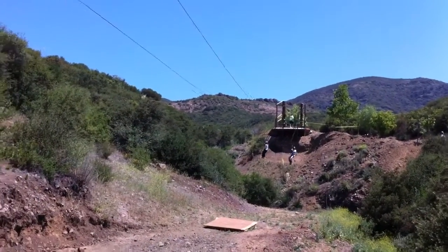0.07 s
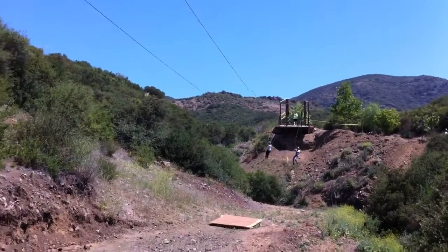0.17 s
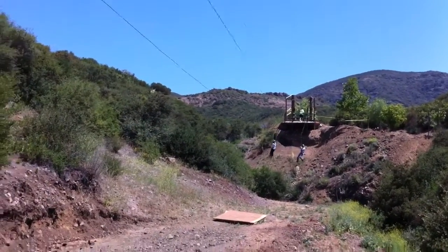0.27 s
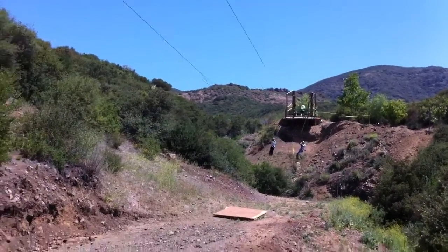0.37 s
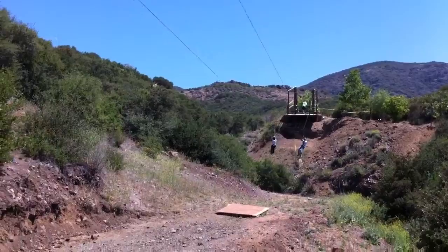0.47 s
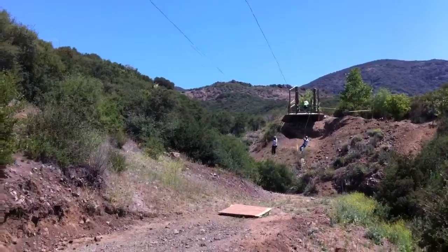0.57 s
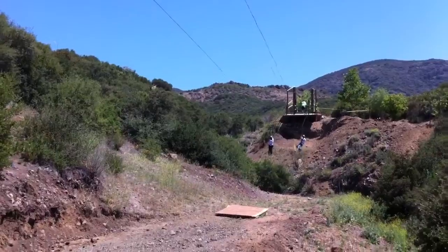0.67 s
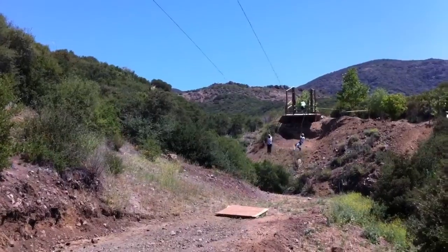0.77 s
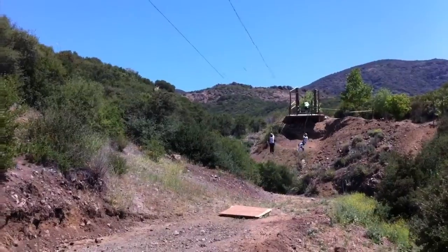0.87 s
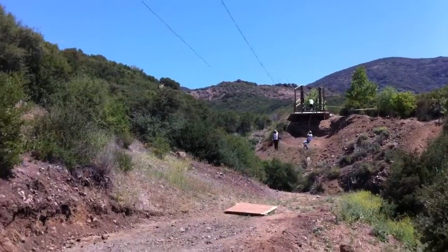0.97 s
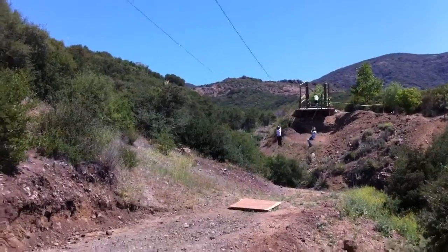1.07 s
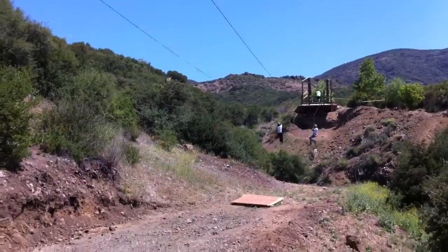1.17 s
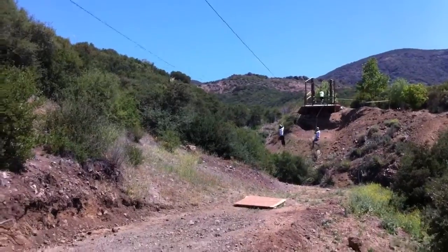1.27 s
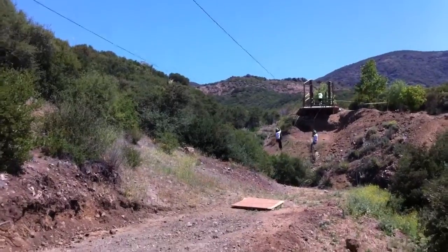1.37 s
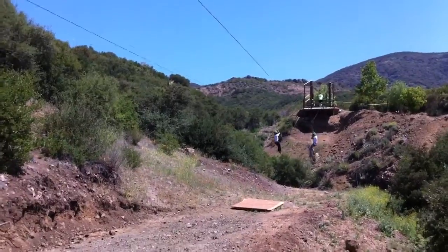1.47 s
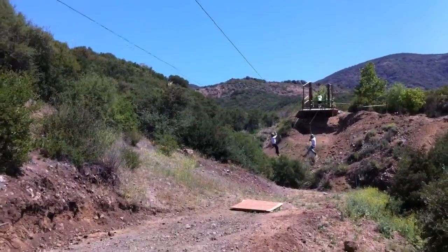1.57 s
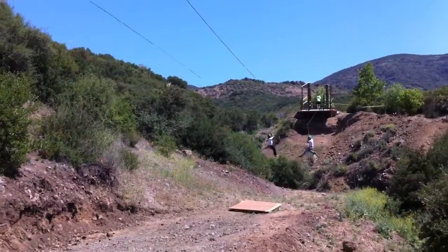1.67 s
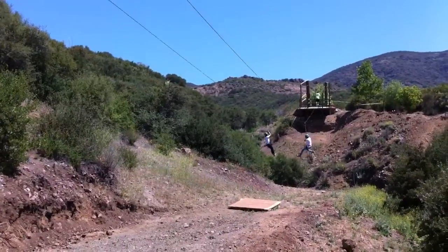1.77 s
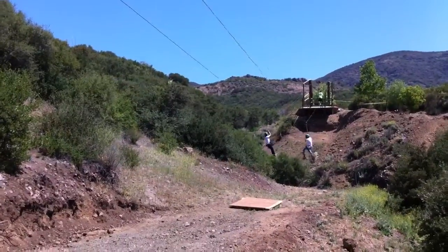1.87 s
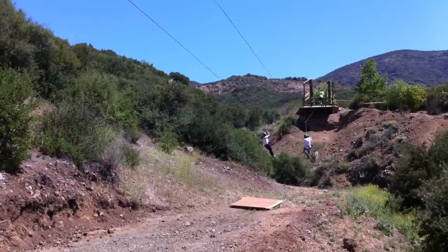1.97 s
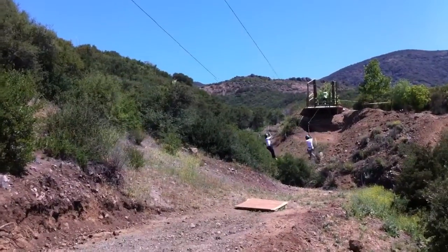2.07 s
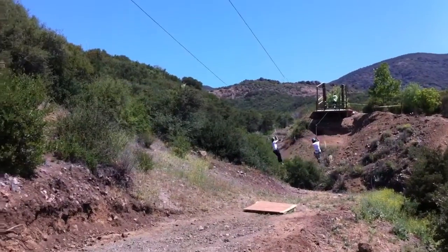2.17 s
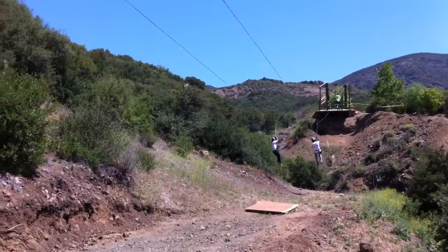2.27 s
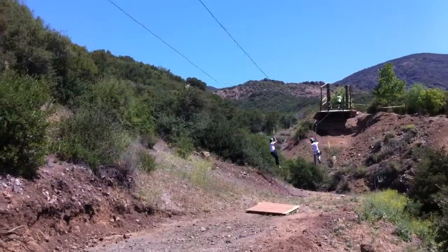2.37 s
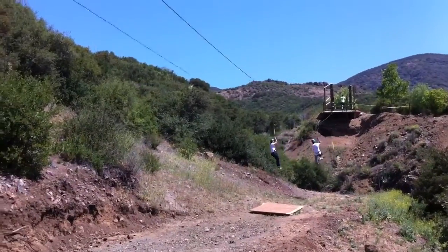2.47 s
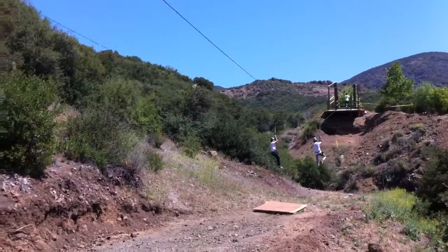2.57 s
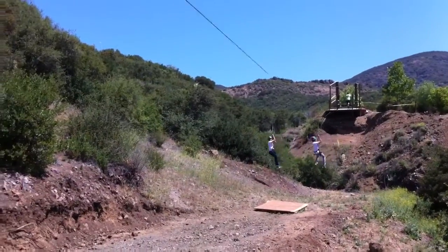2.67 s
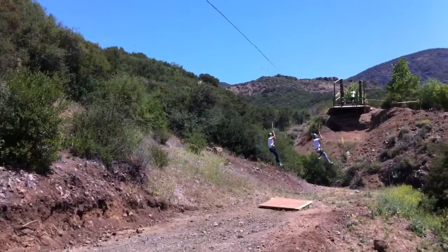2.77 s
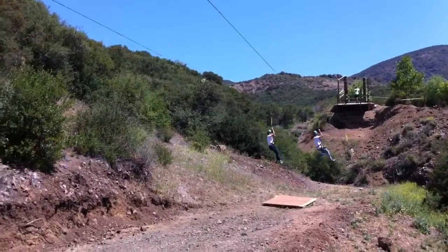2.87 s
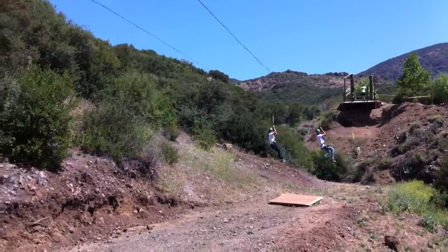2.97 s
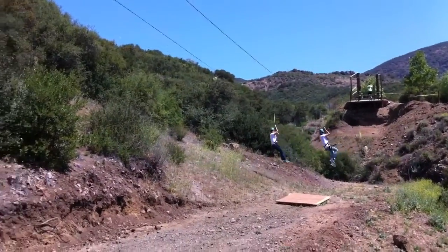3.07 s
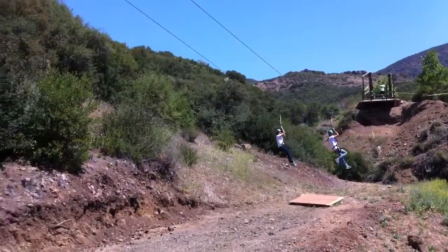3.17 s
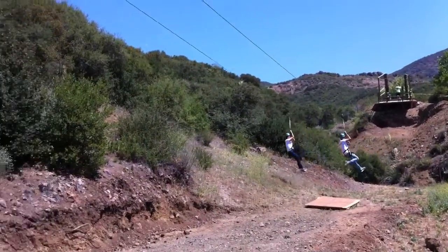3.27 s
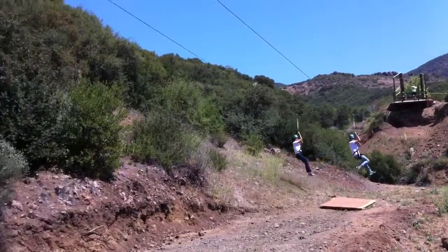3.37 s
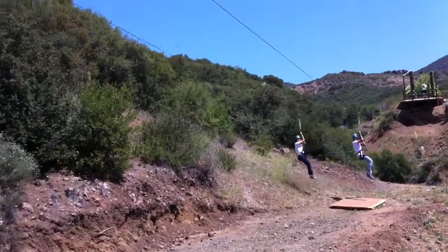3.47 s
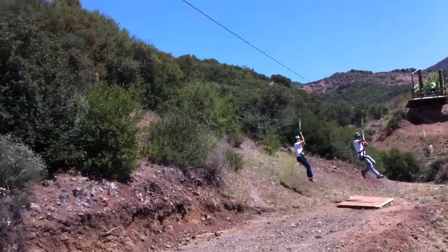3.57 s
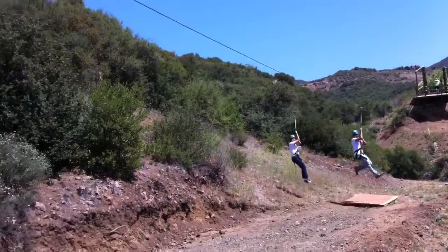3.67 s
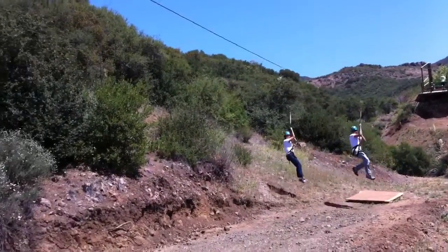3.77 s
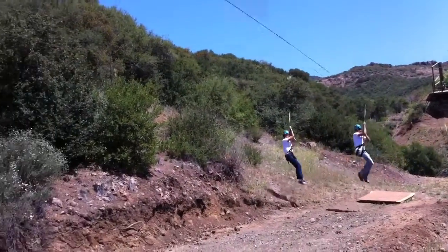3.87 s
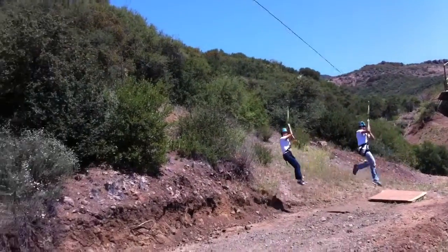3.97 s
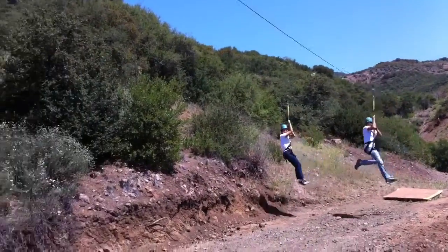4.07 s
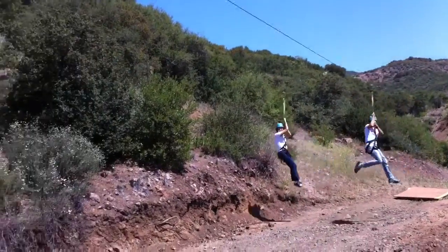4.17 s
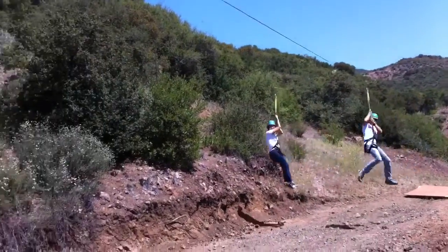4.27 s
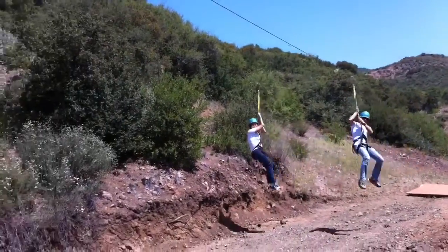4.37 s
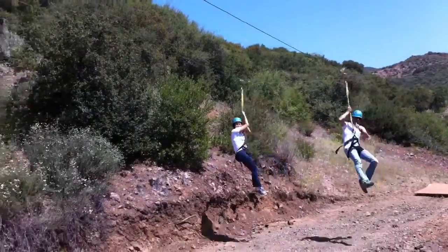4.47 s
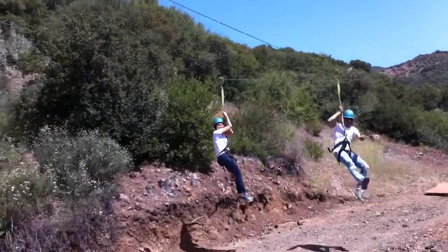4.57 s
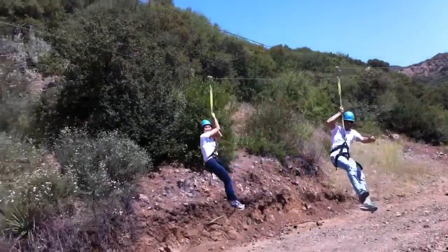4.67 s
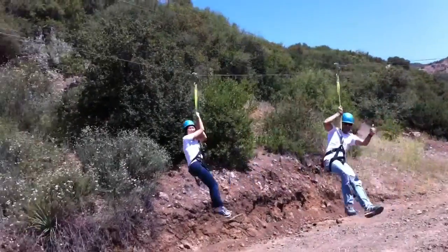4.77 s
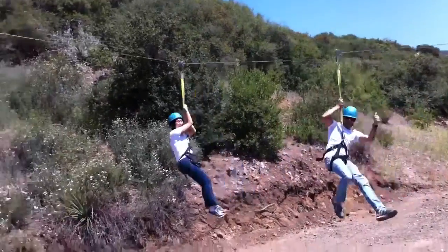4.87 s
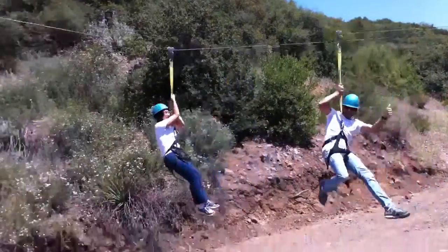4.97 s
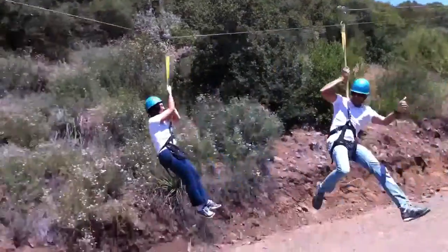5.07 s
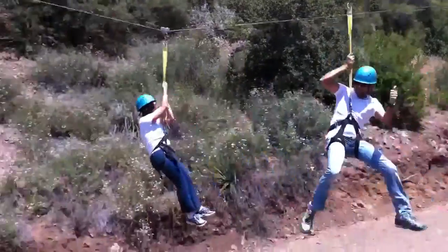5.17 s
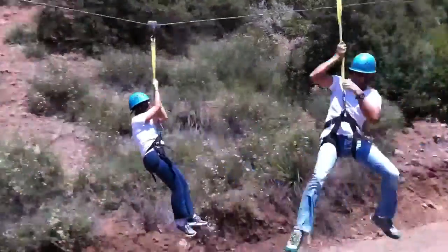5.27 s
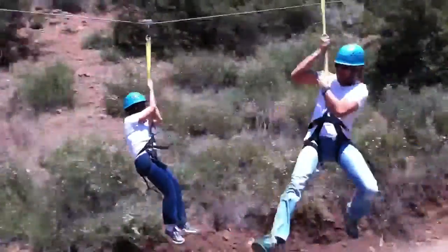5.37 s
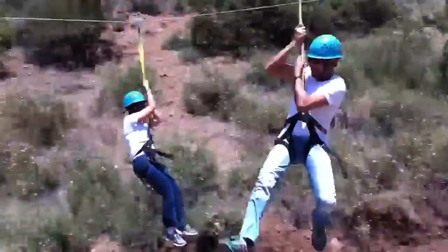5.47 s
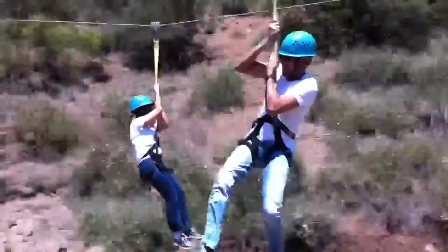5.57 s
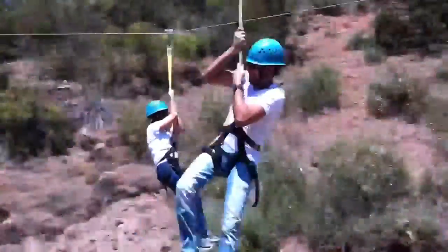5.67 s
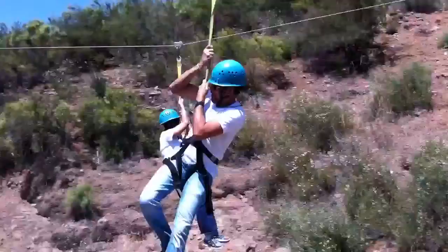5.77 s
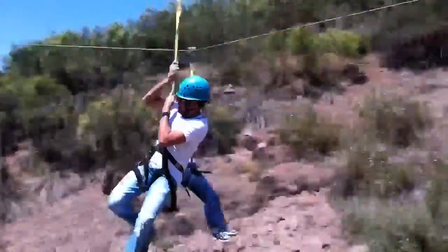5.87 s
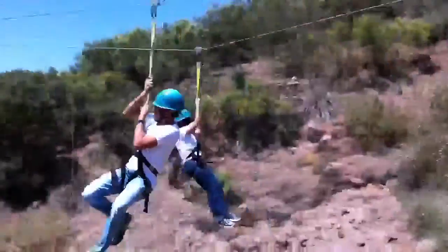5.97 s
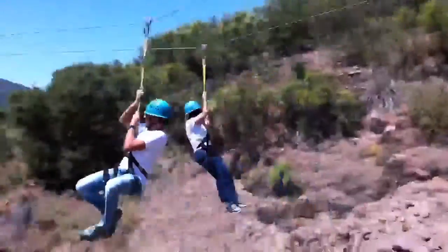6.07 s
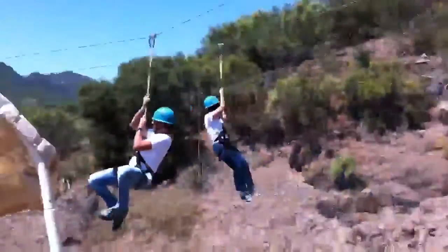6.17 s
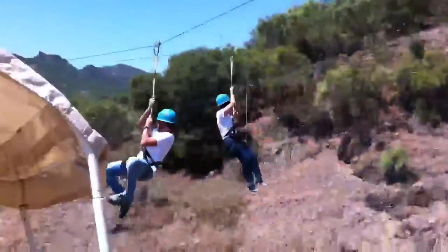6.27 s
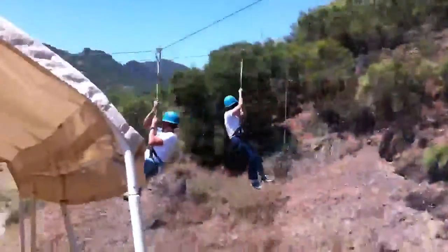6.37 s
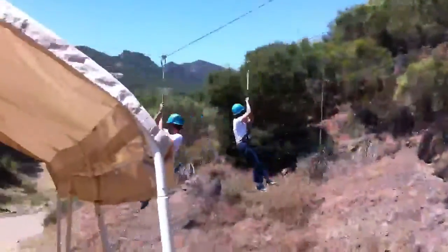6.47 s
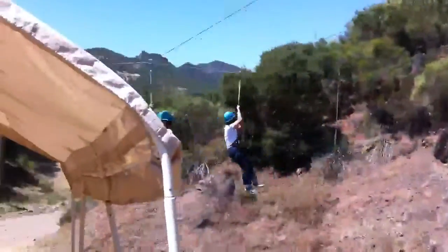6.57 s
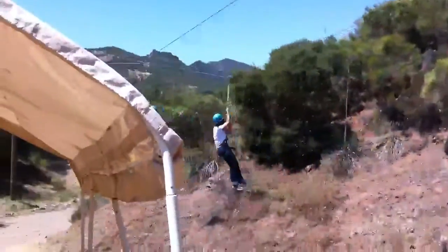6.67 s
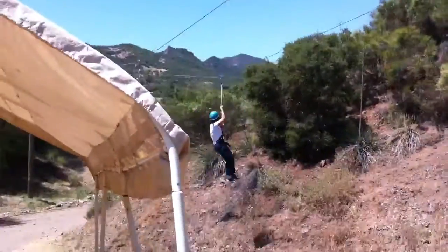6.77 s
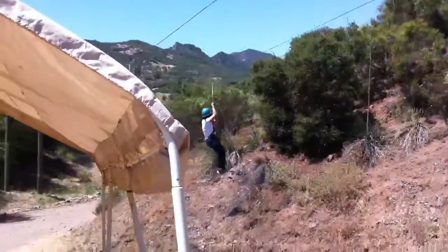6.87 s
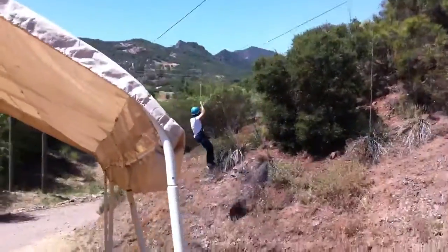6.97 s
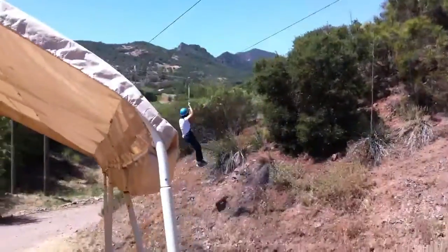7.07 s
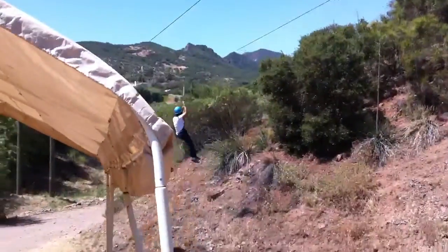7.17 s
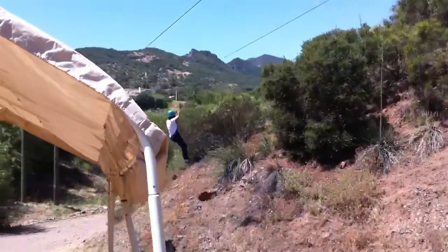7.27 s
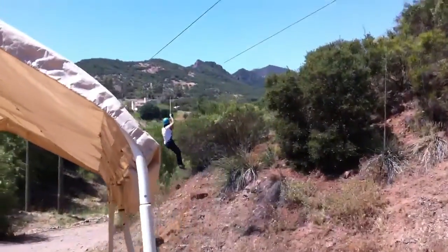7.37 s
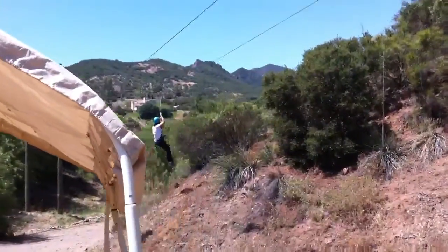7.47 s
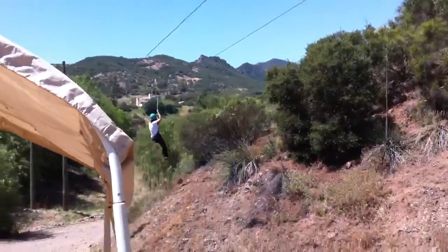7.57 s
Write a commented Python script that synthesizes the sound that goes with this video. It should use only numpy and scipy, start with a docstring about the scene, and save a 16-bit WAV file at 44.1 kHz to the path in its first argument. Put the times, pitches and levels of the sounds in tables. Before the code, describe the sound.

Zip-line pulleys approach on humming steel cables, pass close with a metallic, sizzling whir and recede amid outdoor wind thumps.

```python
"""Two zip-line cables sing in a dry valley as the riders' pulleys bump over the twisted strands.
The riders come down in parallel, pass close by and roll away: the pulleys whir, hiss and sizzle,
the steel trolleys ring, and a dry bearing whistles after the pass.
Gusts buffet the single microphone over steady valley air."""
import sys
import numpy as np
from scipy import signal
from scipy.fft import rfft, irfft, next_fast_len
from scipy.io import wavfile
from scipy.ndimage import map_coordinates

SR = 44100
rng = np.random.default_rng(int(sys.argv[2]) if len(sys.argv) > 2 else 0)


def pcm_store(signal):
    """Save signal as 16-bit PCM."""
    levels = np.round(np.clip(np.atleast_2d(signal), -1, 1) * 32767)
    wavfile.write(sys.argv[1], SR, levels.astype(np.int16).T)


N = 335601
FFT_SIZE = next_fast_len(N)
TIME_S = np.arange(N) / SR
BINS_HZ = np.maximum(np.fft.rfftfreq(FFT_SIZE, 1 / SR), 1)
PASS_S, SPEED_M_S, NEAREST_M, SOUND_M_S = 5.83, 9.0, 3.5, 343

# strand-passing tones, climbing with speed, dipping with the swings: time_s, pitch_hz
FIRST_CABLE_PITCH = [(0, 713), (.3, 770), (.62, 780), (.82, 737), (1.1, 757), (1.28, 890), (1.49, 797),
                     (1.75, 850), (1.94, 773), (2.14, 840), (2.45, 898), (2.63, 780), (2.76, 897),
                     (3.45, 882), (3.62, 915), (5.72, 845), (5.85, 700), (5.98, 865), (6.5, 830),
                     (6.7, 741), (6.98, 844), (7.15, 770), (7.61, 825)]
SECOND_CABLE_PITCH = [(0, 730), (.75, 783), (1.05, 740), (1.5, 820), (1.8, 892), (2.05, 825), (2.75, 925),
                      (2.94, 840), (3.45, 910), (6.1, 875), (6.5, 810), (6.75, 824), (6.88, 725),
                      (7.05, 805), (7.61, 770)]
# singing of both cables: time_s, gain_db
SINGING_GAIN = [(0, -51), (.2, -46), (.65, -39.5), (1.02, -55), (1.7, -39), (2.2, -41), (2.42, -45.5),
                (2.7, -42.5), (2.97, -39.5), (3.1, -50), (3.42, -43.5), (3.92, -43.5), (4.3, -49.5),
                (5.0, -46.5), (5.4, -42), (6.15, -48), (6.45, -41), (6.68, -45.5), (7.0, -40.5),
                (7.61, -48)]
# overtones of the singing: harmonic, gain_db
SINGING_OVERTONES = [(2, -12), (3, -12.5), (4, -13)]
# unevenness of the singing: time_s, depth_db
SINGING_UNEVENNESS = [(0, 1), (2.5, -1.5), (4.4, 8.5), (6.4, 9), (7.61, 13.5)]
# faint drone above the singing: time_s, level_db
DRONE_LEVEL = [(0, -67), (.65, -50), (.9, -55), (1.1, -72), (1.7, -56), (3.0, -66), (6.8, -67), (7.3, -51),
               (7.61, -50)]
# strength of the rolling contact, apart from distance: time_s, gain_db
CONTACT_GAIN = [(0, -4), (.7, .8), (.9, -.8), (1.1, -6.8), (1.35, -4.8), (1.62, 0), (2.5, -.5), (2.95, 1.1),
                (3.17, -1.9), (3.85, 2.5), (4.2, -.3), (4.9, 1.5), (5.6, -1.7), (5.89, .3), (5.99, -2.9),
                (6.38, 1.0), (6.56, -1), (6.87, 3.0), (7.22, 1.8), (7.45, -2.4)]
# broad cable whir: freq_hz, relative_db
WHIR_SPECTRUM = [(200, -15), (480, -8), (700, -7), (1050, -10), (1250, -8), (1550, 0.5), (2200, -0.5),
                 (3000, -10.5), (6000, -24)]
# hiss ahead of, beside and behind the pulleys: freq_hz, relative_db
HISS_FRONT = [(1500, -23.5), (3000, -10.5), (4300, -7), (4650, 3), (4950, 0), (5300, -1), (5800, -2.5),
              (6400, -1), (6900, -3.5), (7400, -7.5), (8400, -7.5), (9500, -2.5), (10900, -5), (12000, -20),
              (16000, -26)]
HISS_SIDE = [(1500, -22), (3900, -13), (4550, 0), (5200, -9.5), (5800, -4), (6500, 4), (7200, 0.5),
             (8000, -4), (8800, -9), (9400, -1.5), (10200, -4), (11000, -0.5), (12000, -16), (16000, -26)]
HISS_REAR = [(1500, -18), (3000, -6.5), (4100, -10.5), (4600, -7.5), (5200, -5.5), (6100, 0), (6900, 2),
             (7600, -3), (8700, -6.5), (9500, -4.5), (10400, -3), (11200, -9), (12000, -21), (16000, -17)]
# sizzle ahead of and behind the bearings: freq_hz, relative_db
SIZZLE_FRONT = [(10000, -17), (11300, 3.5), (12150, -6), (12850, 1.5), (13400, 0), (14700, -2), (15800, -6)]
SIZZLE_REAR = [(10000, -19), (11200, -1), (11800, -6.5), (12350, 4), (13000, -1.5), (13800, -3),
               (14500, -2), (15800, -11)]
# steel side-plate modes, end on and broadside: freq_hz, width_hz, relative_db
PLATE_MODES_END = [(2192, 340, -1.5), (2680, 270, -0.5), (3070, 500, -5), (3418, 370, 1.5),
                   (3970, 890, -10), (4580, 180, -5)]
PLATE_MODES_SIDE = [(1670, 550, -15.5), (2247, 260, -5.5), (2435, 270, -4), (3000, 450, -11),
                    (3400, 270, 3), (4520, 300, -12.5), (6600, 640, -12.5), (11310, 400, -10),
                    (12600, 500, -13), (14400, 246, -19)]
# gusts on the microphone: start_s, hold_s, level_db
WIND_GUSTS = [(0.02, .44, -42), (.5, .23, -48), (1.39, .19, -49), (1.8, .29, -50.5), (2.28, .4, -56),
              (3.35, .13, -45), (3.75, .15, -44), (4.11, .1, -54), (4.93, .23, -35), (5.92, .13, -38.5),
              (6.14, .36, -46.5), (6.92, .25, -44), (7.22, .39, -41.5)]
# single buffets: centre_s, peak_db, width_s
WIND_BUFFETS = [(0.016, -23.5, .03), (0.307, -24, .03), (0.986, -32, .035), (1.48, -17, .014),
                (1.795, -30, .03), (2.691, -37, .03), (3.461, -31, .025), (3.778, -23, .03),
                (3.838, -29, .02), (4.22, -35, .02), (4.86, -25.5, .012), (4.938, -6.5, 0.011),
                (4.985, -15, 0.022), (5.154, -9.5, .011), (5.181, -7, 0.021), (5.525, -21, .02),
                (5.984, -14.5, 0.011), (6.024, -22, 0.012), (6.086, -19, 0.009), (6.385, -30.5, .03),
                (7.346, -25, .018), (7.44, -28, .012)]
# turbulence on the microphone port: freq_hz, relative_db
TURBULENCE_SPECTRUM = [(25, -39), (60, -22), (100, -3), (145, 4), (200, -2), (300, -12.5), (450, -22.5),
                       (800, -32), (2000, -54)]
# valley air: freq_hz, relative_db
VALLEY_SPECTRUM = [(60, -9), (150, -8), (400, -1), (650, -3.5), (1100, 0), (2000, -23), (8000, -37)]


def cables(drone_hz=1170, drone_width_hz=220):
    """The tone travels along both cables, so it hardly swells at the pass."""
    first = cable_tone(FIRST_CABLE_PITCH, jitter=.00596, flutter_db=2, roughness=.24, overtone_db=1)
    second = cable_tone(SECOND_CABLE_PITCH, jitter=.01412, flutter_db=2.5, roughness=.56, overtone_db=-1)
    drone = from_db(curve(DRONE_LEVEL)) * noise(resonances([(drone_hz, drone_width_hz, 0)]))
    return from_db(curve(SINGING_GAIN)) * (from_db(-1) * first + from_db(-4) * second) + drone


def cable_tone(pitch, jitter, flutter_db, roughness, overtone_db):
    """A pulley bumps over the strands; uneven lay shakes pitch and strength."""
    unevenness = from_db(curve(SINGING_UNEVENNESS))
    speed_surge = .014 * np.maximum(unevenness - 1, 0) * drift(rate_hz=5)
    pitch_hz = curve(pitch) * (1 + speed_surge + jitter * drift(40.1))
    phase = 2 * np.pi * np.cumsum(pitch_hz) / SR
    smear = roughness * unevenness
    tone = np.sin(phase) * (1 + smear * drift(58)) + np.cos(phase) * smear * drift(55)
    tone /= np.sqrt(.5 + smear ** 2)
    overtones = sum(from_db(db) * np.sin(round(harmonic) * phase + .55 * drift(60))
                    for harmonic, db in SINGING_OVERTONES)
    # the pulley itself radiates the overtones, so they swell close by
    swell_db = passing_db(near_db=16, fall_db=6.6, rear_db=-4, side_db=7.5, far_db=-5, lobe=.2)
    flutter = unit_rms(from_db(flutter_db * drift(21)))
    return (tone + from_db(swell_db + overtone_db) * overtones) * flutter


def pulleys(chatter_db=.5, rattle_db=.5):
    """Steel rolls on steel; the contact drives whir, hiss and sizzle."""
    contact_db = curve(CONTACT_GAIN)
    rolling = cable_whir(1.1 * contact_db) + pulley_hiss(contact_db) + bearing_sizzle(1.3 * contact_db)
    chatter = unit_rms(from_db(chatter_db * drift(20) + rattle_db * drift(400)))
    return chatter * ground_echo(rolling, bounce=.3)


def cable_whir(drive_db):
    """Broad midrange noise of the cable under the pulleys."""
    pass_db = passing_db(near_db=-32.5, fall_db=9.6, rear_db=-3.4, side_db=-10.5, far_db=-56, lobe=.6)
    return from_db(drive_db + pass_db) * steel_noise(colour(WHIR_SPECTRUM), band_hz=(1100, 2000))


def pulley_hiss(drive_db):
    """Rolling hiss changes colour as the trolleys show front, side and rear."""
    pass_db = passing_db(near_db=-16.6, fall_db=8.2, rear_db=-2.9, side_db=-7.8, far_db=-64, lobe=.52)
    front, side, rear = [steel_noise(colour(view), band_hz=(4200, 10500))
                         for view in (HISS_FRONT, HISS_SIDE, HISS_REAR)]
    approach = blend(front, side, at_s=5.04, over_s=.78)
    return from_db(drive_db + pass_db) * blend(approach, rear, at_s=6.28, over_s=.31)


def bearing_sizzle(drive_db):
    """Fine treble of the bearings, heard from the front, then the rear."""
    pass_db = passing_db(near_db=-17.8, fall_db=11, rear_db=-1.5, side_db=-1.5, far_db=-72)
    front, rear = [steel_noise(colour(view), band_hz=(11800, 15500))
                   for view in (SIZZLE_FRONT, SIZZLE_REAR)]
    return from_db(drive_db + pass_db) * blend(front, rear, at_s=5, over_s=.27)


def side_plates(shake_db=1):
    """The plates ring, most plainly broadside; Doppler shift drops their pitch at the pass."""
    pass_db = passing_db(near_db=-20.4, fall_db=10.7, rear_db=-1.2, side_db=4.8, far_db=-50.8)
    end_on, broadside = [steel_noise(resonances(view), band_hz=(2000, 3800))
                         for view in (PLATE_MODES_END, PLATE_MODES_SIDE)]
    approach = blend(end_on, broadside, at_s=5.2, over_s=.31)
    ringing = blend(approach, end_on, at_s=6.5, over_s=.3)
    shifted = delayed(ringing, (distance_m() - NEAREST_M) / SOUND_M_S)
    level_db = .9 * curve(CONTACT_GAIN) + pass_db + shake_db * drift(41)
    return from_db(level_db) * ground_echo(shifted, bounce=.52)


def bearing_whistle(pitch_hz=12290, width_hz=110, level_db=-36.5, flutter_db=4.5):
    """One dry bearing sings in a narrow, unsteady line."""
    envelope = held(start_s=6.35, end_s=7.23, rise_db_per_s=60, fall_db_per_s=140)
    gain = envelope * from_db(level_db + flutter_db * drift(14))
    return gain * noise(resonances([(pitch_hz, width_hz, 0)]))


def wind(lumps_db=3.3, breeze_db=-66):
    """Lumpy turbulence on the microphone port, with buffets on top; the small port sheds deep bass."""
    gusts = [from_db(db) * held(start_s, start_s + hold_s, rise_db_per_s=170, fall_db_per_s=210)
             for start_s, hold_s, db in WIND_GUSTS]
    flow = np.maximum(np.max(gusts, axis=0), from_db(breeze_db))
    pressure = flow * unit_rms(noise(colour(TURBULENCE_SPECTRUM)) * from_db(lumps_db * drift(32)))
    for centre_s, peak_db, width_s in WIND_BUFFETS:
        burst = buffet(peak_db, width_s)
        at = round(centre_s * SR) - len(burst) // 2 + np.arange(len(burst))
        inside = (at >= 0) & (at < N)
        pressure[at[inside]] += burst[inside]
    return butterworth(pressure, "high", cutoff_hz=60, order=1)


def buffet(peak_db, width_s, size=16384):
    """One packet of eddies; a harder one holds smaller eddies and sounds brighter."""
    top_hz = np.clip(430 * np.exp(.033 * peak_db), 170, 600)
    eddies = butterworth(rng.standard_normal(size), "low", top_hz)
    offset_s = (np.arange(size) - size // 2) / SR
    burst = butterworth(eddies / np.cosh(1.7 * offset_s / width_s), "high", cutoff_hz=118)
    return from_db(peak_db) * burst / np.abs(burst).max()


def valley_air(level_db=-59):
    """Steady, soft rush of air."""
    return from_db(level_db) * noise(colour(VALLEY_SPECTRUM))


def swaying(x, near_depth=.3, far_depth=.17, sway_hz=4.5, patterns=3, points=90):
    """A hanging trolley turns, sweeping its radiation lobes over the microphone, deepest close by."""
    depth = far_depth + (near_depth - far_depth) * NEAREST_M / distance_m()
    spectrum = rfft(x, FFT_SIZE)
    for _ in range(patterns):
        lobes = across_bins(rng.standard_normal(points))
        x = x + depth / np.sqrt(patterns) * drift(sway_hz) * irfft(spectrum * lobes, FFT_SIZE)[:N]
    return x


def ground_echo(x, bounce, cable_height_m=3.0, microphone_height_m=1.3):
    """Close by, the echo sweeps a comb down and up; from afar the scrub scatters it."""
    direct_m = distance_m()
    mirrored_m = np.sqrt(direct_m ** 2 + 4 * cable_height_m * microphone_height_m)
    echo_gain = bounce * (NEAREST_M / direct_m) ** 2
    echo = delayed(x, (mirrored_m - direct_m) / SOUND_M_S)
    return (x + echo_gain * echo) / np.hypot(1, echo_gain)


def passing_db(near_db, fall_db, rear_db, side_db, far_db, lobe=.45):
    """Fall per doubling of distance, front-to-rear lean and side lobe, over a cable-borne floor."""
    range_m = distance_m()
    facing = SPEED_M_S * (TIME_S - PASS_S) / range_m   # -1 coming, 0 abreast, 1 going
    directivity_db = rear_db * facing + side_db * np.exp(-(facing / lobe) ** 2)
    direct_db = near_db - fall_db * np.log2(range_m / NEAREST_M) + directivity_db
    return 20 * np.log10(np.hypot(from_db(direct_db), from_db(far_db)))


def distance_m():
    """Nearer trolley to microphone."""
    return np.hypot(NEAREST_M, SPEED_M_S * (TIME_S - PASS_S))


def steel_noise(gain, band_hz, ripple_db=1.82, points=400):
    """Shaped noise, finely rippled by countless weak modes of wire and hardware."""
    ripple = across_bins(from_db(ripple_db * rng.standard_normal(points)))
    return noise(gain * ripple, band_hz)


def noise(gain, band_hz=(0, SR)):
    """Noise through a frequency response, unit power inside the band."""
    inside = (BINS_HZ >= band_hz[0]) & (BINS_HZ <= band_hz[1])
    white = rng.standard_normal(2 * len(BINS_HZ)).view(complex) * np.sqrt(FFT_SIZE / 2)
    return irfft(white * gain, FFT_SIZE)[:N] / np.sqrt(np.mean(gain ** 2 * inside))


def colour(points):
    """Gain per bin from a spectrum, rolled off below its first point."""
    hz, db = np.transpose(points)
    roll_off = np.minimum(BINS_HZ / hz[0], 1) ** 2
    return from_db(np.interp(np.log(BINS_HZ), np.log(hz), db)) * roll_off


def resonances(modes):
    """Gain per bin of damped modes, each acting twice for steep flanks."""
    power = 0
    for hz, width_hz, db in modes:
        detuning = (BINS_HZ ** 2 - hz ** 2) / (BINS_HZ * width_hz)
        power += (from_db(db) / (1 + detuning ** 2)) ** 2
    return np.sqrt(power)


def drift(rate_hz, size=8192):
    """Smooth random wander, spread about 1."""
    hz = np.arange(size // 2 + 1) * SR / N
    slow = irfft(rfft(rng.standard_normal(size)) / (1 + (hz / rate_hz) ** 2))
    return np.interp(TIME_S, np.linspace(0, N / SR, size), unit_rms(slow))


def held(start_s, end_s, rise_db_per_s, fall_db_per_s):
    """Gain that rises to 1, holds from start to end, and dies away."""
    early_s, late_s = np.clip(start_s - TIME_S, 0, 2), np.clip(TIME_S - end_s, 0, 2)
    return from_db(-rise_db_per_s * early_s - fall_db_per_s * late_s)


def blend(before, after, at_s, over_s):
    """Equal-power crossfade."""
    share = .5 + .5 * np.tanh((TIME_S - at_s) / over_s)
    return np.sqrt(1 - share) * before + np.sqrt(share) * after


def delayed(x, delay_s):
    return map_coordinates(x, [(TIME_S - delay_s) * SR], order=3, mode="mirror")


def butterworth(x, kind, cutoff_hz, order=3):
    return signal.sosfilt(signal.butter(order, cutoff_hz, kind, fs=SR, output="sos"), x)


def curve(rows):
    return np.interp(TIME_S, *np.transpose(rows))


def across_bins(values):
    return np.interp(BINS_HZ, np.linspace(0, SR / 2, len(values)), values)


def unit_rms(x):
    return x / np.sqrt(np.mean(x ** 2) + 1e-20)


def from_db(db):
    return 10 ** (np.asarray(db) / 20)


def scene():
    """One microphone, alike in both channels."""
    air = valley_air()
    mono = cables() + swaying(pulleys() + side_plates()) + bearing_whistle() + wind() + air
    return np.array([mono, mono])


def record(dry):
    """Steep treble cut."""
    cutoff_hz = 15760
    return signal.sosfilt(signal.ellip(12, .1, 90, cutoff_hz, fs=SR, output="sos"), dry)


dry = scene()
out = record(dry)
pcm_store(out)
```